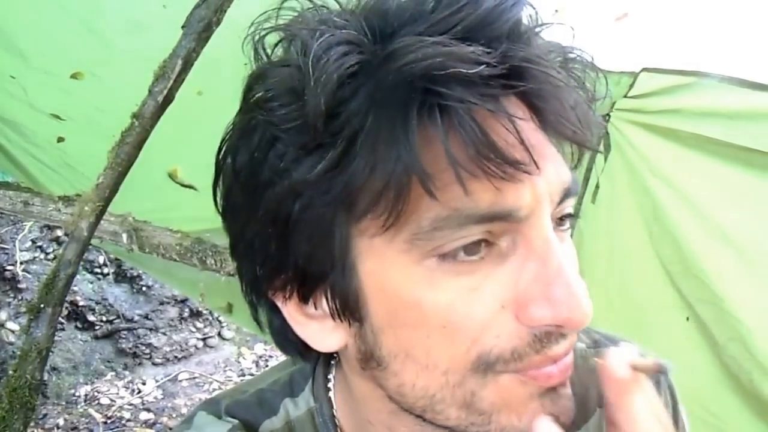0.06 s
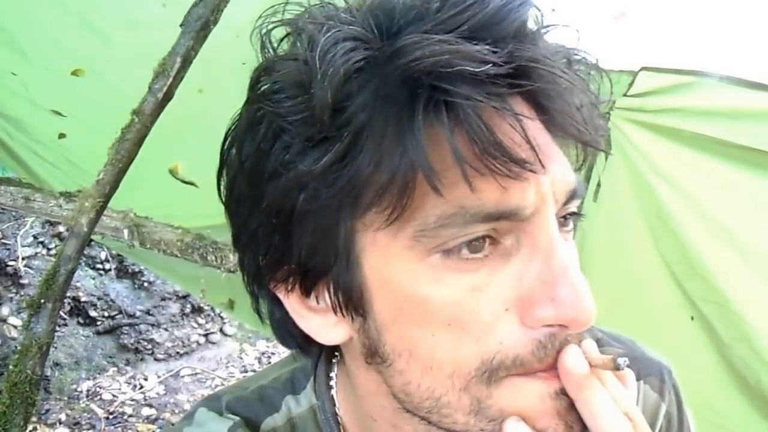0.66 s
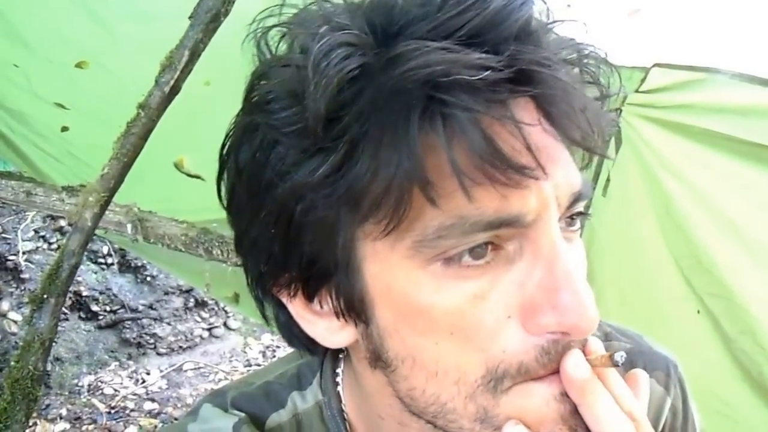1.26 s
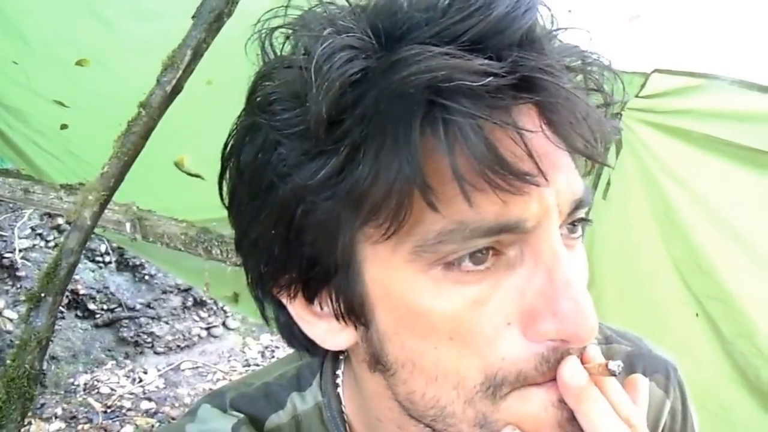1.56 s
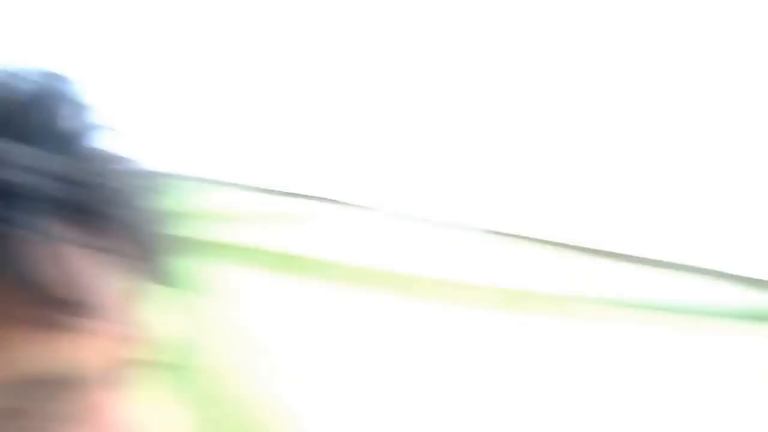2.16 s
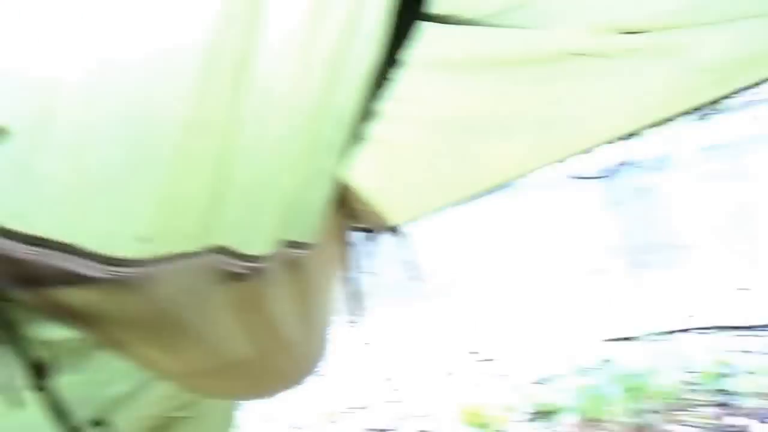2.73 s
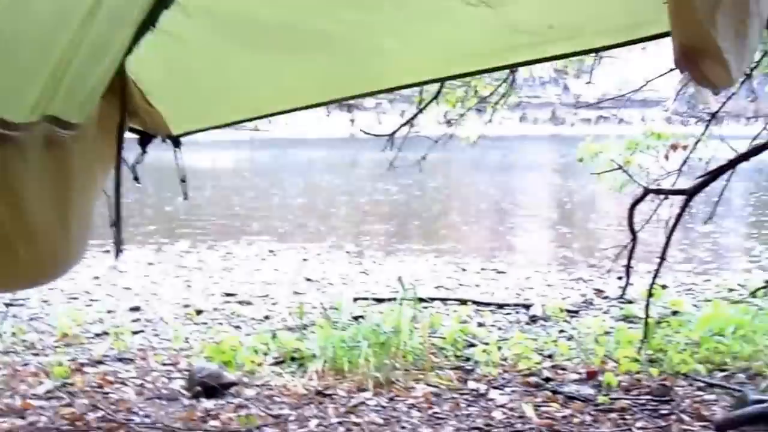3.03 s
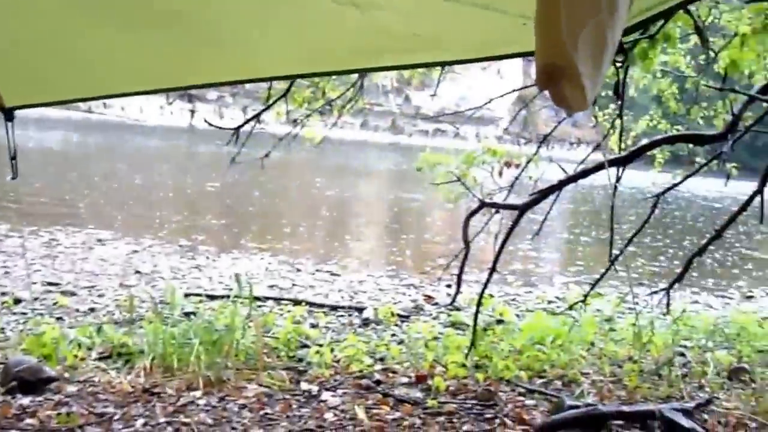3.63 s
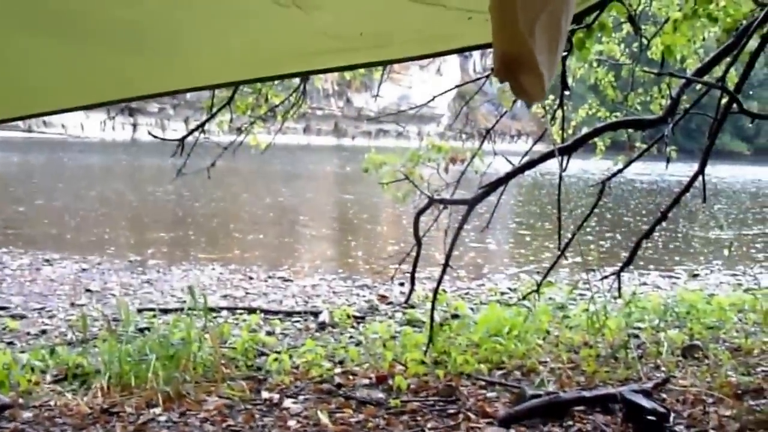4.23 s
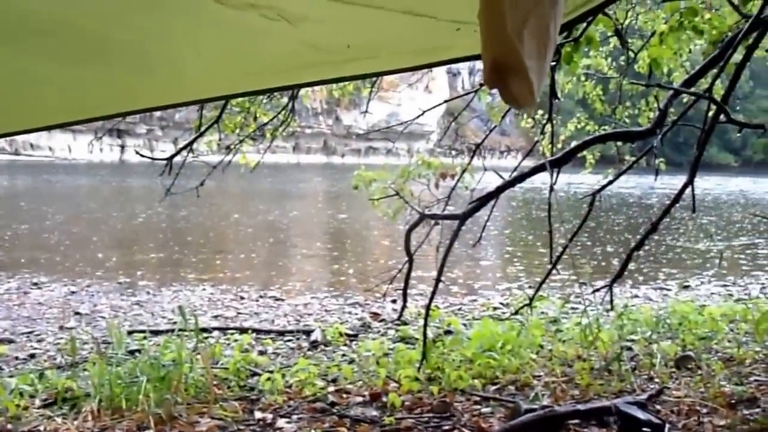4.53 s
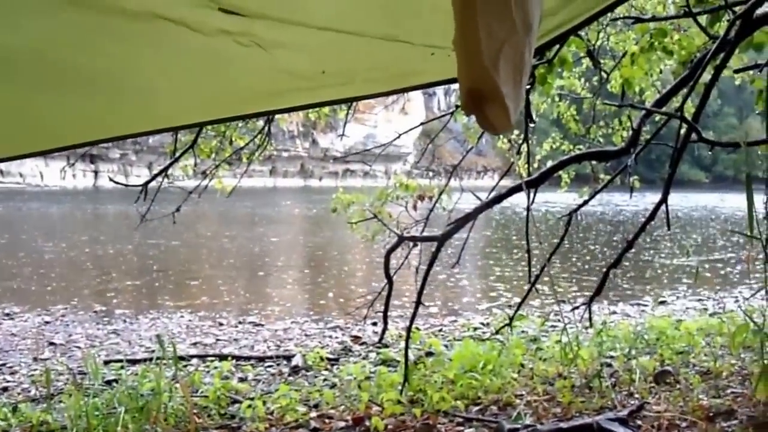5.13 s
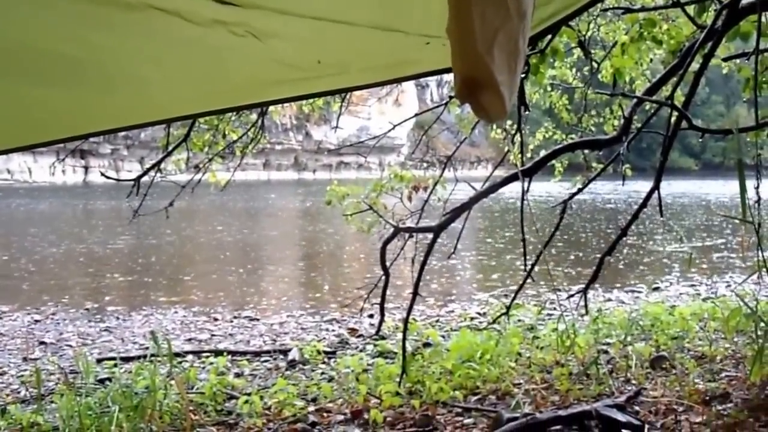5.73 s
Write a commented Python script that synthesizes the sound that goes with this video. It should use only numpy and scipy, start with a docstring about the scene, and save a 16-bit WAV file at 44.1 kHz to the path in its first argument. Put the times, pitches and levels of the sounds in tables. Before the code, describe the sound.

Heard from under a tarp on a wooded riverbank, close, sharp taps of heavy drips land unevenly overhead, some in quick clusters, each ringing very briefly. A light patter and small bright splashes fill the gaps. All around, steady rain hisses on leaves and gravel above a faint outdoor rumble. Midway, the smooth hiss of rain on the river comes forward a little while the tapping carries on.

```python
"""Under a tarp pitched beneath trees beside a river, in steady rain.
Fat drips from the branches snap on the taut cloth: each impact is a pulse that sets the membrane
ringing briefly. Lighter drips and fine drops patter between them, and some burst on leaves and stones.
All around, countless impacts on foliage, gravel and water add up to a hiss over a faint low rumble."""
import sys
import numpy as np
from scipy import signal
from scipy.fft import rfft, irfft, next_fast_len
from scipy.io import wavfile

SR = 44100
rng = np.random.default_rng(int(sys.argv[2]) if len(sys.argv) > 2 else 0)


def to_wav(sig):
    """Store sig (one row per channel, or 1-D mono) as 16-bit WAV at the path in sys.argv[1].

    Samples outside -1..1 are clipped; the rate is SR.
    """
    pcm = np.clip(np.atleast_2d(sig), -1, 1) * 32767
    pcm = np.round(pcm).astype(np.int16)
    wavfile.write(sys.argv[1], SR, pcm.T)  # frames by channels


N = 259484
TAP_SIZE = 4096   # samples in the sound of one impact
TAP_HZ = np.fft.rfftfreq(TAP_SIZE, 1 / SR)

# Fat drips on the tarp; thump, snap and spray are bass, presence and top relative to the middle band:
# start_s, relative_level_db, thump_db, snap_db, spray_db, ring_hz, ring_db, pan_db (left minus right)
FAT_DRIPS = [(0.0405, -37.5, -2, -13, -23, 670, 5, -2), (0.0695, -32, -8, 2, -22, 3940, 1, -9),
             (0.0839, -38, 4.5, 2, -8, 820, 11, -6), (0.1378, -40, -13, 1, -4, 3100, 20, -2),
             (0.1884, -34, 5, 2.5, -13, 1750, 10, 5), (0.288, -40.5, 1, -2, -16, 465, 6, 4),
             (0.3144, -41, -4, -1, -22, 4610, 7, 1), (0.5011, -34.5, 2, -3, -20.5, 1270, 13, -6),
             (0.5528, -28.7, -2, -7, -18, 2200, 11, 2), (0.5881, -25.5, 0, -8, -20, 1540, 9, -1.5),
             (0.726, -33, -12, -14, -30, 2170, 7, -8), (0.743, -37, -8, -8, -23, 610, 8, 3),
             (0.7731, -37, -9, 2, -31, 930, 12, -6), (0.7935, -32, -6, -2.5, -19, 890, -2, -4),
             (1.0389, -38.5, -11, -18, -30, 2350, 14, -2), (1.0649, -33, -7.5, -3, -24, 1330, 11, 4),
             (1.0837, -36.5, -24, -11, -29, 1330, 4, -9), (1.1323, -37.5, 6, 1, -11, 705, 8, -4),
             (1.2086, -27.5, 4, -8, -21.5, 2500, 19.5, -0.5), (1.26, -40, -4, -11, -19, 3260, 10, -13),
             (1.2904, -43.5, 6, 1, -22, 750, 7, 3), (1.3396, -33, -4, -4, -27, 3420, 7, -22),
             (1.4095, -38.5, -9, -11, -34, 6500, 8, -2), (1.5019, -34, -6, -6, -24, 890, 2, -1),
             (1.562, -36, -3, -13, -34, 2040, 5, 0), (1.8234, -30, -6, -4, -9, 2600, -1, 3.5),
             (1.9795, -34, -4, -13, -21, 550, 1, 4), (1.9971, -36.5, -3, -6.5, -21, 4840, 10.5, 3),
             (2.06, -37, -8, -25, -27, 930, 2, -5), (2.1913, -39.5, 7, -0.5, -18, 2530, 6.5, 0),
             (2.2223, -26.5, -3.5, -10, -28.5, 4940, 13.5, -7.5), (2.2403, -29, -2, -7, -30, 620, 2.5, 3),
             (2.3435, -44.5, -11, -17, -34, 5920, 3.5, -4), (2.6767, -32.5, 0, -5, -31, 530, 1, -1),
             (2.6988, -29, 3, -5.5, -20.5, 2700, 11, 1), (2.7236, -37, -8, -6, -34, 6500, 5, 1),
             (3.0065, -33, 3, 2.5, -17.5, 3280, 9, 2.5), (3.147, -32.5, 4, -7, -22.5, 1130, 11, 8),
             (3.1918, -35.5, 0.5, -4, -34, 430, 8, -4), (3.2041, -33.5, -14, 11, -25, 4340, 13, -5),
             (3.2146, -33, -4, 6, -14.5, 5060, 0, -6), (3.253, -30, -2, -4.5, -31, 1180, 5, 1.5),
             (3.2988, -32.5, -9, -7, -19, 2420, 15, -8), (3.4023, -36, 6, -1, -16, 640, 6, 7),
             (3.5187, -38, 0.5, -2, -31, 1180, 12, 2), (3.5837, -41.5, -4, 4, -7.5, 2600, 20, 0),
             (3.6833, -41.5, 7, -5, -20, 660, 1, -5), (3.7282, -37, -27, -12, -27, 2100, 3, 3),
             (3.9195, -39, -7, 8, -9, 4800, 14, -8), (4.056, -37.5, -2, -1, -13, 3450, 7, -17),
             (4.097, -40.5, 0, -10, -14, 816, 12, 1), (4.134, -27, -3, 0.5, -17, 3580, 14, -7),
             (4.198, -40, -1, -16, -26, 5700, 10, 0), (4.442, -37, 1.5, 2.5, -23, 5530, 6, -4),
             (4.5747, -30, -0.5, -5, -27, 6050, 12, -4), (4.6228, -30, -4, -11.5, -35, 5060, 15, -1),
             (4.7876, -42, 4, -4, -21, 5470, 20, -11), (4.8612, -30, 4, 2, -10.5, 3900, 13.5, -4),
             (4.8707, -30, -3, -6.5, -14.5, 634, 6, -1), (4.908, -36, 6.5, -16, -32, 685, 11, -2),
             (5.0032, -36.5, 0, -3, -17, 1080, 14, 0), (5.0258, -39.5, 2.5, -9, -24, 620, 8, 8),
             (5.0499, -38.5, -17, -5, -14, 5800, 25, -16), (5.178, -33.5, 4, -5, -20, 690, 13, 2),
             (5.2243, -41, -11, -11, -31, 5920, 19, 1), (5.3532, -38.5, -18, 4, -16, 6500, 0, 0),
             (5.3648, -36.5, -5, -10, -18, 620, 7, 3), (5.4195, -29.5, 3.5, -2.5, -22, 636, 7, -3),
             (5.619, -29.5, 3.5, -1, -17, 920, 10, 0.5), (5.6611, -32.5, 4.5, -4.5, -13.5, 5060, 3.5, -5),
             (5.7505, -29.5, -3.5, 1, -17.5, 3300, 5, -1), (5.7634, -39, -13, -1, -17, 3320, 15, 4),
             (5.8019, -42, 5, 1, -10, 1070, 15.5, 2)]
# How hard the fine drops fall on the tarp: time_s, fall_db
FINE_FALL = [(0.0, -55), (0.36, -54.5), (1.24, -48.5), (1.35, -47.5), (1.48, -51.5), (1.76, -52.5),
             (1.87, -52), (2.32, -55.5), (2.56, -56), (3.33, -52), (3.51, -54), (4.16, -54.5), (4.68, -50),
             (4.79, -50), (5.21, -51), (5.36, -55), (5.7, -57)]
# Drips that break up on twigs and land as a cloud of droplets: centre_s, level_db
DROPLET_CLOUDS = [(0.1, -44), (0.79, -41.5), (1.0, -43.5), (1.44, -45), (1.67, -44.5), (1.9, -44),
                  (2.838, -40.5), (4.53, -44), (5.02, -46)]
# Drips bursting on nearby leaves and stones: start_s, relative_level_db
NEAR_SPLASHES = [(0.382, -49.5), (0.807, -49), (0.9917, -48), (1.6532, -47), (1.761, -51), (1.863, -47.5),
                 (1.965, -47), (2.039, -46), (2.39, -48), (2.574, -44.5), (2.634, -46.5), (2.9, -47),
                 (3.369, -43), (3.543, -49.5), (3.869, -47), (3.893, -47), (4.223, -44), (4.26, -40),
                 (4.7146, -45.5), (5.5576, -42.5), (5.58, -49), (5.7725, -49)]
# Rain on leaves and gravel: time_s, level_db
FOLIAGE_LEVEL = [(0, -48.5), (1.0, -48.3), (2.0, -49.5), (2.4, -50.5), (2.85, -48.5), (3.3, -48.8),
                 (3.38, -44), (3.48, -49), (4.1, -47.5), (4.65, -50), (5.3, -46.7), (5.88, -48.8)]
# Rain on the river, louder once the microphone has turned towards it: time_s, level_db
RIVER_LEVEL = [(0, -55), (1.0, -54), (2.5, -56.5), (3.1, -57), (3.4, -48), (3.7, -51), (4.3, -48),
               (5.0, -53), (5.88, -54.5)]

# Spectral densities of the sources: frequency_hz, relative_density_db
CLOTH_SPECTRUM = [(60, -14), (130, -11.5), (220, -3), (450, 0.5), (800, 1), (1500, -0.5), (3000, 3),
                  (4500, 3), (6300, 6.5), (8000, 9), (11000, 2.5), (14500, -6)]   # a drip on the tarp
FINE_DROP_SPECTRUM = [(80, -27), (200, -10.5), (500, 1.5), (900, 1), (2000, 1), (4000, -4), (6500, -11),
                      (14000, -21)]   # a fine drop on the tarp
SPLASH_SPECTRUM = [(300, -12.5), (1500, -4.5), (3500, 2.5), (5500, 3), (7800, -1.5), (11000, -4),
                   (14000, -6)]   # a bursting drip
FOLIAGE_SPECTRUM = [(150, -11), (400, -8), (1000, -1.5), (2200, 2.5), (4000, 1.5), (5200, -1), (6500, -3),
                    (8000, -6), (10500, -10), (14000, -19)]   # rain on leaves and gravel
RIVER_SPECTRUM = [(300, -17.5), (1000, -7.5), (2200, -2), (4000, 0), (5200, -1.5), (6500, -13), (9000, -21),
                  (14000, -38)]   # rain on open water
AIR_SPECTRUM = [(15, -6), (29, -0.5), (42, -1.5), (62, -4.5), (85, -6), (130, -11.5), (220, -12),
                (500, -22.5)]   # outdoor rumble

# Stereo width of the drips on the tarp, and of all other sources: frequency_hz, side_re_mid_db
DRIP_WIDTH = [(50, -30), (160, -17), (350, -12), (650, -5), (1100, -1.5), (2400, 1), (5000, 0), (6400, 4.5),
              (7400, -6.5), (14000, -9)]
FIELD_WIDTH = [(30, -14), (160, -13), (350, -9), (650, -2.5), (1100, 1), (2400, 1.5), (5000, 0.5),
               (6600, 1.5), (7300, -14.5), (14000, -38)]
# Unequal sensitivity of the microphone's two sides: frequency_hz, left_minus_right_db
SENSITIVITY_BALANCE = [(400, 0.5), (1000, -1), (2200, -1), (4500, -3), (7000, -3), (10000, -0.5)]


def tarp_drips(gain_db=27.5, heft=0.28, closeness=0.22, ring_lingers=0.2, attack_blur_db=-20.0):
    """A struck membrane rings briefly, at a pitch set by its tension where the drip lands."""
    out = np.zeros((2, N))
    for row in list(FAT_DRIPS) + light_drips():
        start_s, level_db, thump_db, snap_db, spray_db, ring_hz, ring_db, pan_db = row
        bands = [(380, thump_db), (800, 0), (1900, 0), (4000, snap_db), (8000, spray_db)]
        colour_db = at_hz(CLOTH_SPECTRUM, TAP_HZ) + at_hz(bands, TAP_HZ)
        # a loud drip is heavy and close: it reaches deeper, and its pulse stands clear of the flutter
        force_db = level_db + 26
        colour_db += at_hz([(150, heft * force_db), (400, 0)], TAP_HZ)
        # slack cloth rings lower and is damped more, which broadens the resonance
        peak_db = ring_db * resonance(ring_hz, octaves=0.31 * (3000 / ring_hz) ** 0.24)
        # the pulse carries the whole resonance, the tails only a share of it
        hit = impact(colour_db + ring_lingers * peak_db, DRIP_WIDTH, pan_db,
                     flutter_db=-0.3 - closeness * force_db, flutter_t60_s=0.037,
                     echo_db=-6.0 - closeness * force_db, echo_t60_s=0.11,
                     pulse_ring_db=(1 - ring_lingers) * peak_db,
                     lead_s=0.00003 * pan_db, scatter_s=0.00011)   # the louder ear tends to lead
        hit *= from_db(level_db + gain_db)
        add(out, start_s, hit)
        # faint copies of the hit, a few milliseconds early or late, soften its attack
        for offset, size in rng.standard_normal((3, 2)):
            add(out, start_s + 0.0044 * offset, from_db(attack_blur_db) * size * hit)
    return out


def light_drips(count=24, crowding=3.0, ring_range_hz=(1200, 6500)):
    """Random arrivals crowd where the rain falls hardest; returns rows like those of FAT_DRIPS."""
    cumulative_rate = np.cumsum(from_db(crowding * in_time(FINE_FALL)))
    start_s = np.searchsorted(cumulative_rate, rng.random(count) * cumulative_rate[-1]) / SR
    mean_db, spread_db = (-44, -8, -6, -22, 9, -2.5), (1.0, 5.2, 5.4, 5, 3, 5.8)
    drawn_db = mean_db + spread_db * rng.standard_normal((count, 6))
    level_db, thump_db, snap_db, spray_db, ring_db, pan_db = drawn_db.T
    ring_hz = np.exp(rng.uniform(*np.log(ring_range_hz), count))
    return list(zip(start_s, level_db, thump_db, snap_db, spray_db, ring_hz, ring_db, pan_db))


def tarp_patter(per_s=200, spread_db=2.3, ring_db=7.5):
    """Fine drops excite many spots of the membrane, each with its own resonance."""
    drop_db = at_hz(FINE_DROP_SPECTRUM, TAP_HZ)
    spots = [impact(drop_db + ring_db * resonance(ring_hz, octaves=0.32), FIELD_WIDTH, pan_db=1.5,
                    flutter_db=1.0, flutter_t60_s=0.021, echo_db=-1.0, echo_t60_s=0.18)
             for ring_hz in np.geomspace(700, 4500, 40)]
    return patter_envelope() * shower(spots, per_s, spread_db)


def patter_envelope(base_db=-50, swing=1.5, swell_s=0.039):
    """Incoherent sounds add in power: each droplet cloud is a brief swell on top of the steady fall."""
    t = np.arange(N) / SR
    fall_db = in_time(FINE_FALL)
    power = from_db(base_db + swing * (fall_db - fall_db.mean())) ** 2
    for centre_s, level_db in DROPLET_CLOUDS:
        power += from_db(level_db) ** 2 * np.exp(-((t - centre_s) / swell_s) ** 2)
    return np.sqrt(power)


def splashes(gain_db=28.3, ring_db=5.5):
    """A brief impact has a broad spectrum: a drip bursts on leaf or stone into a bright spray."""
    out = np.zeros((2, N))
    for start_s, level_db in NEAR_SPLASHES:
        ring_hz = rng.uniform(6000, 12000)
        colour_db = at_hz(SPLASH_SPECTRUM, TAP_HZ) + ring_db * resonance(ring_hz, octaves=0.11)
        spray = impact(colour_db, FIELD_WIDTH, pan_db=3.0,
                       flutter_db=1.0, flutter_t60_s=0.032, echo_db=4.0, echo_t60_s=0.092)
        add(out, start_s, from_db(level_db + gain_db) * spray)
    return out


def foliage_rain(ticks_per_s=420, spread_db=3.5, wash_db=-2.24, ticks_db=-4.5, ring_db=13.5):
    """Far impacts superpose into a flickering wash; nearer ones tick on leaves and gravel with a pitch."""
    flicker_db = 4.0 * drift(per_s=25)
    wash = from_db(wash_db + flicker_db) * diffuse_noise(FOLIAGE_SPECTRUM)
    tick_db = at_hz(FOLIAGE_SPECTRUM, TAP_HZ) + at_hz([(700, -8.5), (3000, 0)], TAP_HZ)
    spots = []
    for ring_hz in np.geomspace(1700, 12000, 48):
        tick = impact(tick_db + ring_db * resonance(ring_hz, octaves=0.13), FIELD_WIDTH, pan_db=-7.5,
                      flutter_db=4.5, flutter_t60_s=0.015, echo_db=1.0, echo_t60_s=0.098)
        # high-pitched ticks come from smaller drops and are fainter
        size_db = at_hz([(4500, -5.5), (13000, -8.5)], ring_hz)
        spots.append(from_db(size_db) * tick)
    ticks = from_db(ticks_db) * shower(spots, ticks_per_s, spread_db)
    return from_db(in_time(FOLIAGE_LEVEL)) * (wash + ticks)


def river_rain():
    """Countless far splashes on the water add with random phases into a smooth hiss."""
    return from_db(in_time(RIVER_LEVEL)) * diffuse_noise(RIVER_SPECTRUM)


def air_rumble(level_db=-58.0, swell_db=1.0):
    """Low outdoor noise swells and sinks under slow random amplitude modulation."""
    return from_db(level_db - swell_db * drift(per_s=3.9)) * diffuse_noise(AIR_SPECTRUM)


def impact(colour_db, width, pan_db, flutter_db, flutter_t60_s, echo_db, echo_t60_s,
           pulse_ring_db=0, lead_s=0, scatter_s=0.00022):
    """Impulse response of a landing: a pulse, a flutter of waves in the sheet, an echo under the tarp."""
    t = np.arange(TAP_SIZE) / SR
    # the pulse reaches one ear a little before the other
    left_lead_s = lead_s + scatter_s * rng.uniform(-1, 1)
    lag_samples = np.round(SR * np.maximum(left_lead_s * np.array([[-1], [1]]), 0))
    pulse = np.where(np.arange(TAP_SIZE) == lag_samples, -1, 0)
    # the struck spot may ring more clearly under the pulse than in the scattered waves
    pulse = minimum_phase(pulse, pulse_ring_db + np.zeros(len(TAP_HZ)))
    tails = np.zeros((2, TAP_SIZE))
    for tail_db, t60_s in ((flutter_db, flutter_t60_s), (echo_db, echo_t60_s)):
        decay = np.exp(-np.log(1000) * t / t60_s)
        tails += from_db(tail_db) * rms_one(rng.standard_normal((2, TAP_SIZE)) * decay)
    ear_gains = rms_one(from_db(split_between_ears(pan_db)))
    left, right = ear_gains * (pulse + tails / np.sqrt(TAP_SIZE))
    mid_db, side_db = mid_and_side(colour_db, width, TAP_HZ)
    mid, side = minimum_phase(left + right, mid_db), minimum_phase(left - right, side_db)
    return rms_one(np.array([mid + side, mid - side])) / np.sqrt(TAP_SIZE)


def shower(spots, per_s, spread_db):
    """A Poisson process: drops of uneven size land independently on a set of spots; rms one."""
    gap_draw, size_draw, spot_draw = rng.random((8000, 3)).T
    times_s = np.cumsum(-np.log(1 - gap_draw)) / per_s
    sizes = from_db(spread_db * np.minimum(-np.log(1 - size_draw), np.pi))
    struck = (spot_draw * len(spots)).astype(int)
    out = np.zeros((2, N))
    for start_s, size, spot in zip(times_s, sizes, struck):
        if start_s < N / SR:
            add(out, start_s, size * spots[spot])
    return rms_one(out)


def diffuse_noise(spectrum):
    """A wide, steady noise field is only partly correlated between the ears; rms one."""
    white = rng.standard_normal((2, N))
    mid, side = coloured(white, lambda hz: mid_and_side(at_hz(spectrum, hz), FIELD_WIDTH, hz))
    return rms_one(np.array([mid + side, mid - side]))


def mid_and_side(colour_db, width, hz):
    """Power divides between what the two ears have in common and what differs."""
    width_db = at_hz(width, hz)
    mid_db = colour_db - 10 * np.log10(1 + from_db(width_db) ** 2)
    return mid_db, mid_db + width_db


def split_between_ears(difference_db):
    """A level difference raises the left ear by half and lowers the right by half."""
    return difference_db * np.array([[.5], [-.5]])


def resonance(centre_hz, octaves):
    """A Lorentzian peak of height one over log frequency, with its half-width in octaves."""
    return 1 / (1 + (np.log2((TAP_HZ + 1) / centre_hz) / octaves) ** 2)


def minimum_phase(x, gain_db):
    """Causal filtering by a folded cepstrum: nothing sounds before the impact."""
    cepstrum = irfft(np.log(from_db(gain_db)))
    cepstrum[1:TAP_SIZE // 2] *= 2
    cepstrum[TAP_SIZE // 2 + 1:] = 0
    return irfft(rfft(x) * np.exp(rfft(cepstrum)))


def coloured(x, gain_db_at):
    """Zero-phase filtering of a long sound by a gain that depends on frequency."""
    size = next_fast_len(N, real=True)
    gain = from_db(gain_db_at(np.fft.rfftfreq(size, 1 / SR)))
    return irfft(rfft(x, size) * gain, size)[..., :N]


def drift(per_s):
    """Slow fluctuation: Gaussian values joined by straight lines."""
    knots = rng.standard_normal(2000)
    return np.interp(np.arange(N) / SR * per_s, np.arange(len(knots)), knots)


def in_time(rows):
    """A control curve interpolated at every sample."""
    return np.interp(np.arange(N) / SR, *np.transpose(rows))


def at_hz(points, hz):
    """A spectrum interpolated over log frequency."""
    knots_hz, values_db = np.transpose(points)
    return np.interp(np.log(hz + 1), np.log(knots_hz), values_db)


def add(out, start_s, sound):
    """Superpose one impact at a given time."""
    start = int(np.clip(round(start_s * SR), 0, N - 1))
    out[:, start:start + TAP_SIZE] += sound[:, :N - start]


def from_db(db):
    """Decibels to amplitude ratio."""
    return 10 ** (np.asarray(db) / 20)


def rms_one(x):
    """Normalise to unit mean power."""
    return x / np.sqrt(np.mean(x ** 2) + 1e-20)


def scene():
    """Sound pressures add linearly: the tarp overhead and the wet valley around it."""
    return tarp_drips() + tarp_patter() + splashes() + foliage_rain() + river_rain() + air_rumble()


def record(dry, cutoff_hz=14300):
    """Microphone response: the right side is more sensitive to presence, and the top is cut steeply."""
    heard = coloured(dry, lambda hz: split_between_ears(at_hz(SENSITIVITY_BALANCE, hz)))
    low_pass = signal.ellip(10, .2, 80, cutoff_hz, fs=SR, output="sos")
    return signal.sosfilt(low_pass, heard)


dry = scene()
out = record(dry)
to_wav(out)
```